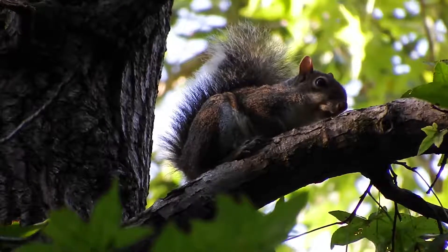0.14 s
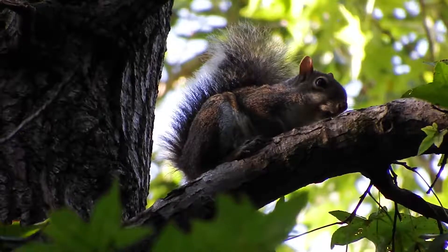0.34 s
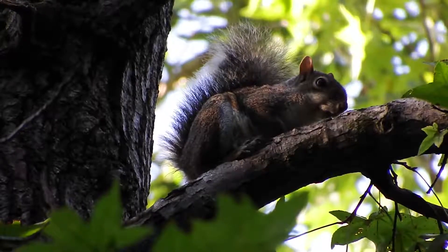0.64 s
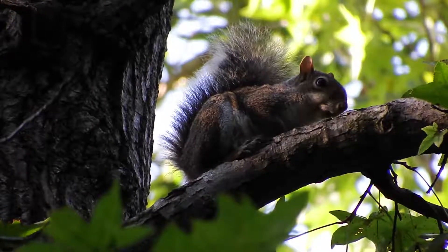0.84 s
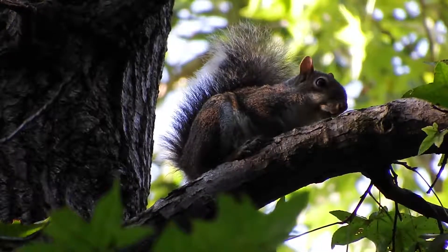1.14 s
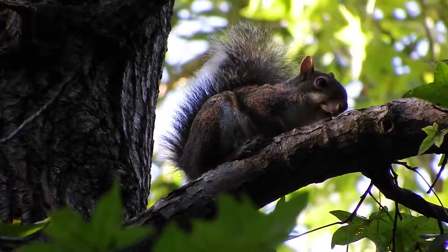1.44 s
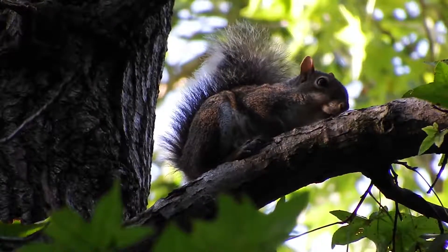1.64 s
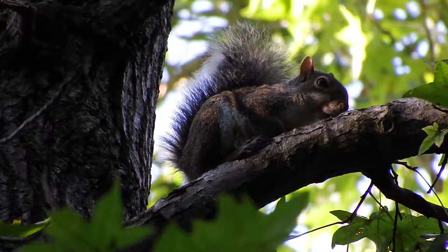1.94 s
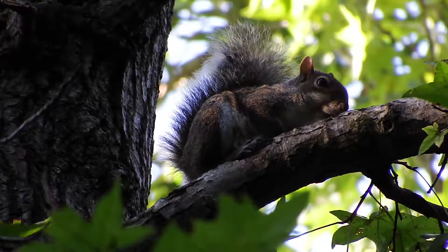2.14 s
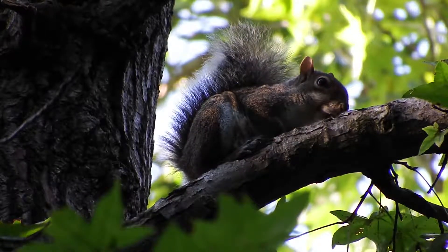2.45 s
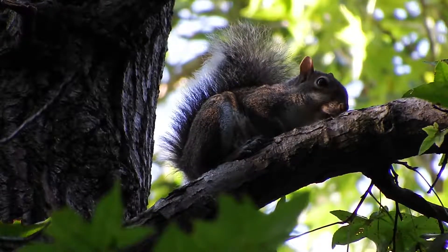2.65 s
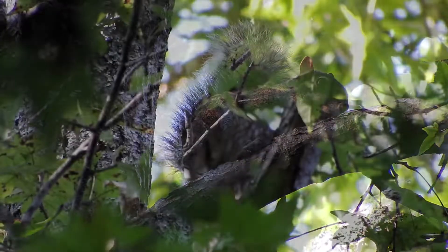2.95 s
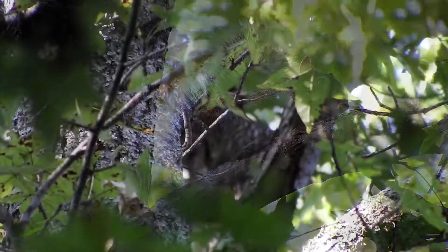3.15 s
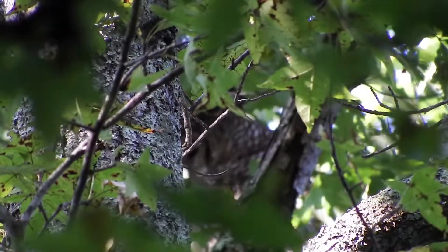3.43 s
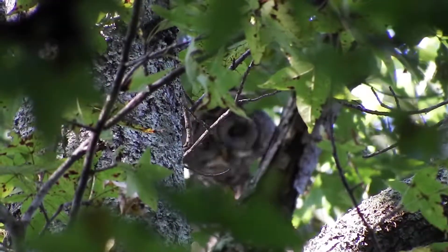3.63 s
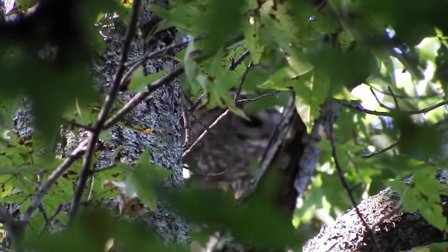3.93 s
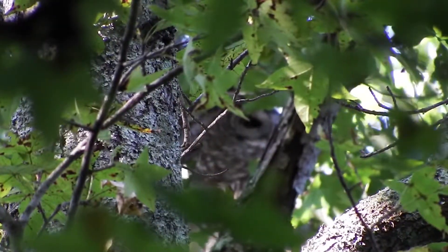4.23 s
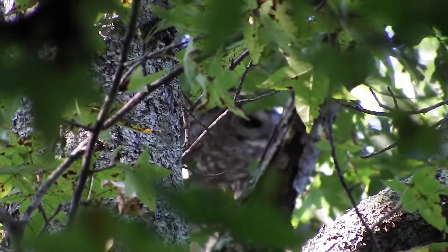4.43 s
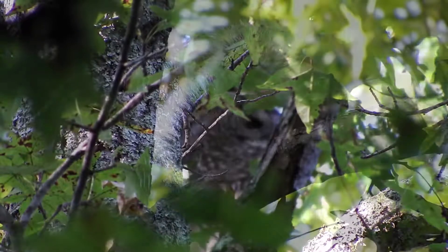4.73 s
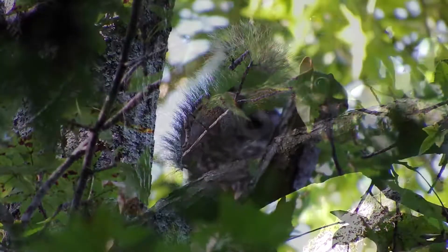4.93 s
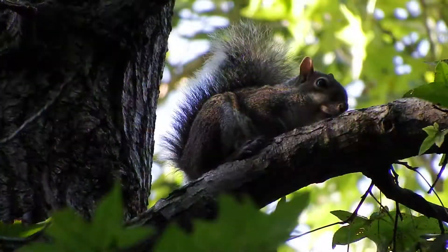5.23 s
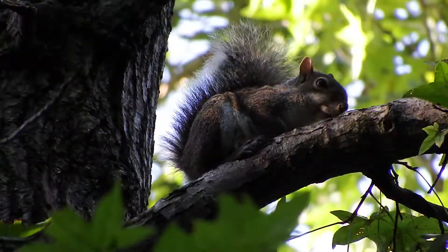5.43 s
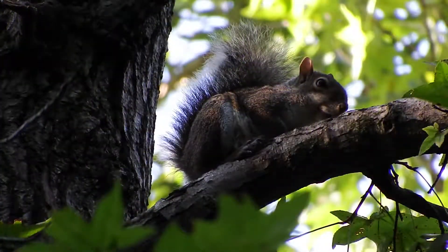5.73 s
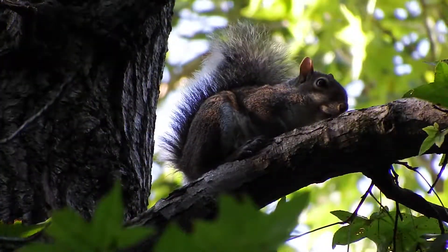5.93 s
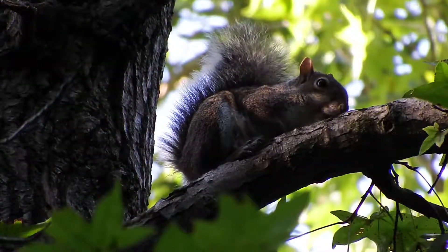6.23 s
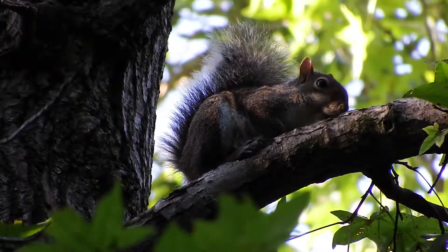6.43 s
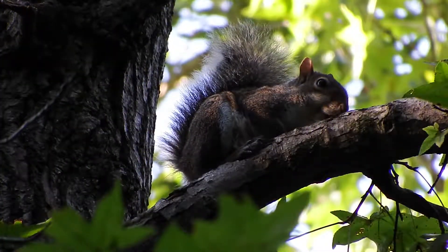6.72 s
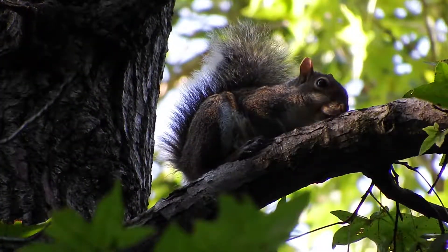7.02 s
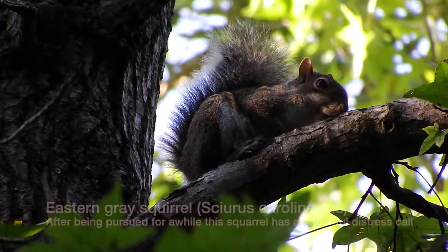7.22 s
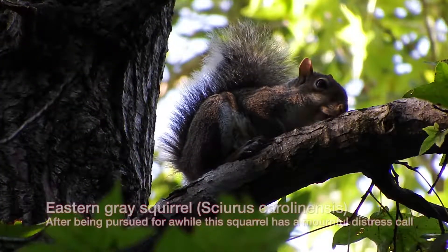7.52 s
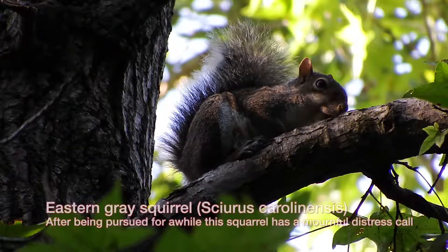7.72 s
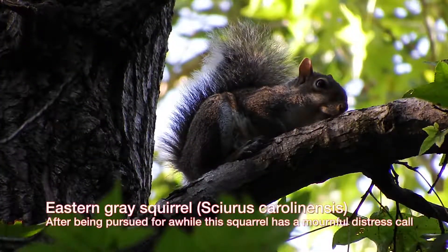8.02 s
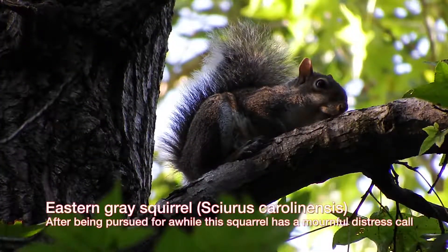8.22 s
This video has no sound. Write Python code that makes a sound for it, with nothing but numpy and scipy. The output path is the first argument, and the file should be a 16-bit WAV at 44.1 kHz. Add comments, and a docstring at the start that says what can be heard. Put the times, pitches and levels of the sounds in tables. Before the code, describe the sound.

A small camera motor ticks and clacks off, then a squirrel moans hoarsely in woodland, a wren sings loudly, and the squirrel moans again over hiss.

```python
"""A camera's lens motor ticks first, over distant wash and single far whistles; then a squirrel moans twice
in a wood, another answers once, a wren sings four phrases and a far bird whistles on.
Birds are gliding sines; moans are rough harmonics and air puffs through three moving mouth resonances.
Random echoes make the wood, shaped noise the wash, and ringing steps the motor. The microphone is dull
above 5 kHz, with narrow dips, and its amplifier hisses."""
import sys
import numpy as np
from scipy import signal
from scipy.io import wavfile
from scipy.ndimage import uniform_filter1d

SR = 44100
rng = np.random.default_rng(int(sys.argv[2]) if len(sys.argv) > 2 else 0)


def store_pcm(level_fs):
    """Save levels as 16-bit WAV."""
    pcm = np.round(np.clip(level_fs, -1, 1) * 32767).astype(np.int16)
    wavfile.write(sys.argv[1], SR, np.atleast_2d(pcm).T)


N = 369024

# Levels in the tables are relative: the mix, the wood and the microphone act on them afterwards.
# Spectrum of the distant wash: freq_hz, level_db per Hz
WASH_SPECTRUM = [(25, -52), (45, -52), (85, -20), (160, -13), (200, -12.5), (270, -4), (450, -2),
                 (750, 1.57), (1300, -4.5), (2300, -12.5), (2900, -12), (3900, -11), (6000, -22.5)]
# Spectrum of the amplifier hiss: freq_hz, level_db per Hz
HISS_SPECTRUM = [(30, -29), (300, -34), (6000, -2.5), (9000, -1.5), (15800, -7.5)]
# Stereo likeness of the wash: freq_hz, likeness (0-1)
WASH_LIKENESS = [(60, 1), (130, 0.96), (280, 0.89), (700, 0.92), (1300, 0.97), (2400, 0.92), (4400, 0.99)]
# Decay of the wood by band: freq_hz, t60_s (at damping 1)
WOOD_DECAY = [(1500, 0.99), (3000, 1), (5000, 0.69)]
# Colour of the microphone: freq_hz, level_db
MIC_COLOUR = [(20, -2), (4100, -1.26), (4450, 0), (4750, -6.5), (5200, -11), (5800, -17.5), (7000, -19.5),
              (9000, -36), (11000, -47)]
# Narrow dips of the microphone: freq_hz, width_hz, depth_db
MIC_DIPS = [(217.6, 17.5, 23), (1094, 109, 15), (2440, 36, 6)]
# Strength of the motor over time: time_s, level_db, loss_db of every other step
MOTOR_LEVELS = [(0.0, -47, 2), (.3, -50.5, 3), (.65, -47, 4), (1.0, -48.5, 26), (1.3, -48, 18),
                (1.46, -48.5, 3)]
# Resonances of the camera housing: freq_hz, width_hz, level_db
HOUSING_MODES = [(349, 117, -3.5), (813, 280, 4), (1454, 345, -1), (1880, 1080, -6.5), (3390, 880, -7.5),
                 (4256, 200, -5.5)]
# Far bird's song, one row a repeat: held_note_start_s, level_db, held_note_hz, low_notes_db
FAR_SONGS = [(1.305, -44.5, 3815, -51), (1.695, -41, 3784, -55), (2.14, -44, 3673, -56),
             (2.54, -46.5, 3610, -69), (7.32, -40.5, 3780, -54.5), (7.712, -42.5, 3715, -51),
             (8.1, -42, 3647, -71)]
# Its high notes: lag_s from the held note, length_s, start and end pitch (shares of it), level_db, buzz (0-1)
FAR_HIGH_NOTES = [(-.095, 0.082, .815, .815, -5, 0.8), (-.022, 0.0236, .845, 0.94, 0, 0.44),
                  (0, .125, 1.002, .998, 0, 0.14)]
# Its low notes: lag_s from the held note, length_s, start_hz, end_hz, level_db, buzz (0-1)
FAR_LOW_NOTES = [(0.112, 0.0502, 2018, 2437, 3.5, 0.3), (0.196, 0.086, 2450, 2455, 5.5, 0.17)]
# Far two-note calls: start_s, level_db
FAR_CALLS = [(.388, -47), (.758, -49), (1.127, -47.5)]
# Notes of such a call: lag_s, length_s, start_hz, end_hz, level_db, buzz (0-1)
FAR_CALL_NOTES = [(0, 0.0183, 3450, 2895, 3, 0.66), (0.047, 0.024, 3740, 3800, 0, 0.16)]
# Single far notes: start_s, length_s, start_hz, end_hz, level_db, buzz (0-1)
FAR_LONE_NOTES = [(0.0, 0.083, 3124, 3040, -52.5, 1), (0.014, 0.067, 4170, 4320, -51, 1),
                  (2.794, 0.16, 3333, 3230, -46, 0.2), (2.951, 0.11, 3200, 3000, -50, 0.34)]
# Sharp falling click that opens the wren's song: level_db, start_hz, end_hz, glide_s, t60_s
WREN_CLICK = (-13, 4000, 3150, .0012, .012)
# Wren's opening chips: start_s, level_db, start_hz, end_hz, length_s
WREN_CHIPS = [(4.877, -22.5, 3780, 3520, 0.0064), (5.271, -18, 3960, 3430, 0.0069),
              (5.665, -18.5, 3980, 3690, 0.011)]
# Side notes of a chip: lag_s (from its start / its end), length_s, start_hz, end_hz, level_db
WREN_CHIP_LEAD = (-.008, .005, 4850, 4650, -18)
WREN_CHIP_TAIL = (-.0015, .006, 3150, 2700, -12)
# Wren's phrases: start_s, level_db, pitch factor, closing_fall_db, hook_db
WREN_PHRASES = [(4.5445, -32.5, 0.99, -36.5, -50), (4.9545, -27.5, .985, -36.5, -31),
                (5.3525, -23.5, .975, -33.5, -27.5), (5.7484, -22.5, 1.002, -32.5, -45)]
# Notes of a phrase before its pitch factor: lag_s, length_s, start_hz, end_hz, level_db
WREN_PHRASE_NOTES = [(-.04, 0.035, 2374, 2200, -14), (-.005, 0.018, 2664, 3177, 0),
                     (0.011, 0.0084, 3520, 3990, -4), (0.014, 0.0206, 3970, 4360, -6.5),
                     (0.035, .014, 4450, 4900, -6), (.086, 0.028, 2285, 2760, -7.5),
                     (.104, 0.0202, 2688, 2912, -1)]
# Dip into the first strong note: lag_s, length_s, start_hz, end_hz
WREN_HOOK = (-.014, .013, 3050, 2700)
# Closing fall before the pitch factor: lag_s, length_s, start_hz, end_hz
WREN_FALL = (.14, .075, 2290, 1800)
# Thin whistles in the voice late in a moan: start_s, length_s, start_hz, end_hz, level_db, buzz (0-1)
SQUIRREL_SQUEAKS = [(2.626, 0.159, 2843, 2726, -42, 0.24), (7.038, .3, 2740, 2640, -44, 0.49)]
# Moans: start_s, length_s, slowing of the drawn-out part, full_voice_s from the start, first-cry brightness_db
SQUIRREL_MOANS = [(1.792, 1.11, 1.001, 0.111, 29), (6.184, 1.2, 1.24, 0.055, 40)]
# Voice, one table a moan, before slowing: time_s, pitch_hz, roughness (0-1), strong-weak share (0-1)
SQUIRREL_VOICES = [
    [(0, 585, .07, .03), (.035, 540, .1, .05), (.055, 525, .2, .9), (.12, 540, .25, .9), (.2, 520, .35, .7),
     (.24, 488, .18, .1), (.31, 448, .11, .05), (.37, 422, .12, .1), (.46, 405, .3, .3),
     (.63, 392, .45, .5), (.8, 412, .45, .4), (.95, 404, .35, .2), (.97, 556, .45, .6), (1.11, 545, .7, .5)],
    [(0, 530, .07, .03), (.05, 525, .1, .08), (.066, 515, .25, .9), (.14, 535, .33, .9), (.2, 518, .38, .8),
     (.255, 470, .16, .1), (.35, 432, .14, .1), (.4, 414, .35, .8), (.45, 410, .35, .8),
     (.52, 390, .33, .3), (.67, 388, .45, .4), (.75, 404, .5, .5), (.95, 410, .4, .3), (.97, 556, .5, .6),
     (1.11, 545, .7, .5)],
]
# Mouth, one table a moan, before slowing: time_s, low_db, mid_db, high_db, low_hz, mid_hz, high_hz
SQUIRREL_MOUTHS = [
    [(0, -65, -55, -58, 2180, 3020, 3850), (.02, -32, -59, -52, 2190, 2900, 4160),
     (.046, -28.5, -48, -29.5, 2000, 2800, 4100), (.1, -28, -55, -34.5, 2070, 2870, 3970),
     (.19, -34, -40.5, -34, 1990, 3300, 3790), (.24, -47, -33.5, -34, 2340, 3380, 3900),
     (.31, -45, -36, -48, 2180, 3150, 3770), (.4, -38.5, -40.5, -45, 2040, 3260, 3700),
     (.63, -39.5, -44, -47.5, 1980, 3120, 3950), (.78, -41.5, -46, -36, 2090, 3140, 3630),
     (.86, -47, -51, -45, 2050, 2970, 4100), (.955, -58, -60, -39, 2050, 2800, 3980),
     (.975, -36.5, -54, -36.5, 2260, 2700, 3950), (1.04, -41.5, -53, -36, 2240, 2700, 3970),
     (1.11, -63, -54, -61, 2180, 2750, 3800)],
    [(0, -77, -53, -70, 2120, 3000, 3950), (.02, -29, -59, -55, 2100, 2920, 4260),
     (.046, -39, -37, -35, 2130, 2960, 4150), (.09, -29.5, -57, -36.5, 1940, 2900, 3970),
     (.17, -36, -44, -36, 2100, 3330, 3840), (.24, -42, -35, -36.5, 2260, 3350, 3850),
     (.31, -45, -38, -54, 2230, 3120, 3750), (.4, -37.5, -43, -52.5, 2000, 3230, 3800),
     (.63, -40.5, -43, -44.5, 1940, 3050, 3900), (.72, -41, -46, -41, 2020, 3270, 3850),
     (.8, -45, -54, -45.5, 2130, 3200, 4080), (.9, -50, -45, -40, 2080, 3220, 4180),
     (.955, -61, -55, -38, 2050, 3150, 4000), (.975, -34, -59, -37, 2320, 3100, 3950),
     (1.0, -41, -56, -43, 2190, 2970, 4000), (1.04, -65, -52, -56, 2150, 2820, 3820)],
]
# The other squirrel's moan, voice and mouth: columns as for the first squirrel
OTHER_MOAN = (4.81, .51, 1, 0, -20)
OTHER_VOICE = [(0, 1010, .07, .02), (.03, 995, .07, .02), (.062, 1008, .07, .02), (.07, 1015, .12, .6),
               (.14, 1012, .12, .6), (.17, 1000, .15, .15), (.26, 942, .25, .3), (.34, 950, .3, .3),
               (.39, 1020, .2, .1), (.51, 1010, .3, .1)]
OTHER_MOUTH = [(0, -49, -60, -62, 1940, 2720, 4050), (.02, -42.5, -44, -56, 1900, 2660, 3960),
               (.06, -38, -47, -42.5, 1820, 2900, 3900), (.15, -38, -59, -39, 1780, 2900, 3740),
               (.19, -53, -49, -45, 1900, 2660, 3770), (.27, -54, -39, -39, 1730, 2460, 3340),
               (.35, -63, -41, -56, 1780, 2490, 3750), (.45, -47, -46, -42, 1820, 2660, 4030),
               (.51, -59, -63, -44, 1900, 2650, 4000)]

WASH_DB, HISS_DB = -46, -63.5
EDGE_HZ = 15800  # upper band limit
CLICK_S, STOP_S = 4.4782, 1.517  # the wren's click and the motor's closing clack
STOP_DB = -23
NEAR_APART, FAR_APART = .04, .15  # left-right spread of the echoes
NEAR_DAMPING, FAR_DAMPING = 1.5, .84  # the squirrels' echoes die sooner
SHARP_WET_DB = -5  # clicks and chips are aimed at the camera and stir the wood less
FALL_FADE_DB = -10.5  # the wren's fall dies away as it descends
FLUTTER_DB = 12  # level flutter per unit of buzz, which counts up to 0.2 here
BREAK_S = .35  # the slide down ends and the drawn-out part begins
STRAND_DB = 4.5  # each harmonic wavers by itself, times the root of roughness
WAVER_DB = 3  # each mouth resonance wavers, times roughness
HELD_DB = -6.5  # the voice holds back after the first cry
BRIGHT_S = .064  # the top resonance is strong in the first cry, then fades


def gain_of(db):
    """Decibels to amplitude."""
    return 10 ** (np.asarray(db) / 20)


def evened(x):
    """Brings a sound to rms 1."""
    return x / np.sqrt(np.mean(x ** 2) + 1e-20)


def read(points, hz):
    """Reads a curve along a logarithmic frequency axis."""
    f, value = np.transpose(points)
    return np.interp(np.log(hz + 1), np.log(f + 1), value)


def add(mix, s, sound):
    """Lays a sound into the mix at s seconds."""
    part = mix[round(s * SR):][:len(sound)]
    part += sound[:len(part)]


def drift(count, size):
    """Smooth chance of rms 1."""
    return evened(uniform_filter1d(uniform_filter1d(rng.standard_normal(count), size), size))


def above(x, hz):
    """Third-order high-pass."""
    return signal.sosfilt(signal.butter(3, hz, "high", fs=SR, output="sos"), x)


def resonate(x, hz, width_hz):
    """Moving resonance: shifts the curve hz down to zero, smooths twice, and shifts back."""
    turn = np.exp(2j * np.pi * np.cumsum(hz * np.ones(len(x))) / SR)
    r = np.exp(-np.pi * width_hz / SR)
    smooth = signal.lfilter([(1 - r) ** 2], [1, -2 * r, r * r], x / turn)
    return 2 * (turn * smooth).real


def note(length, start_hz, end_hz, db, buzz=0, edge=0.057):
    """A gliding sine; buzz shakes its pitch and level, edge is the faded share of its length."""
    count = max(round(length * SR), 40)
    hz = np.linspace(start_hz, end_hz, count) * (1 + 0.1 * buzz * drift(count, size=30))
    level = gain_of(db + FLUTTER_DB * min(buzz, .2) * drift(count, size=400))
    fade = signal.windows.tukey(count, np.clip(edge, 0, 1))
    return level * np.sin(2 * np.pi * np.cumsum(hz) / SR) * fade


def noise(points, same, patchy_db):
    """Two channels of random short-time spectra with drifting patches, for wash and hiss."""
    frames, hz = N // 512 + 8, np.fft.rfftfreq(2048, 1 / SR)
    a, b, c, d, patches = rng.standard_normal((frames, 1025, 5)).T
    patches = evened(uniform_filter1d(uniform_filter1d(patches, 20, 0), 8, 1))
    like = np.clip(read(same, hz), -1, 1)[:, None]
    left = a + 1j * b
    right = like * left + np.sqrt(1 - like ** 2) * (c + 1j * d)
    z = np.array([left, right]) * gain_of(read(points, hz)[:, None] + patchy_db * patches)
    return evened(signal.istft(z, nperseg=2048, noverlap=1536)[1][:, 2048:N + 2048])


def wood(x, apart, damping):
    """Sparse echoes off trunks and leaves, dying by band, a little weakened at first; both ports nearly alike."""
    taps = np.zeros((2, SR))
    at = np.arange(300, SR - 20, 20) + rng.integers(0, 20, (2, (SR - 301) // 20))
    np.put_along_axis(taps, at, rng.choice([-1., 1.], at.shape), 1)
    hz, t, z = signal.stft(taps, SR, nperseg=256)
    decay = gain_of(-60 * damping * t / read(WOOD_DECAY, hz)[:, None])
    early_loss = 1 - 0.4 * np.exp(-t / 0.4)
    a, b = signal.istft(z * decay * early_loss, SR, nperseg=256)[1]
    tail = np.array([a + apart * b, a - apart * b]) / np.linalg.norm(a)
    return signal.fftconvolve(x[None], tail, axes=1)[:, :N]


def microphone(x):
    """Causal colour of the capsule behind its port: narrow dips and a steep loss of treble."""
    hz = abs(np.fft.fftfreq(16384, 1 / SR))
    dips_db = sum(depth_db / (1 + (2 * (hz - f) / w) ** 2) for f, w, depth_db in MIC_DIPS)
    log_gain = np.log(gain_of(read(MIC_COLOUR, hz) - dips_db))
    # the phase that belongs to this gain in a minimum-phase filter
    phase = -signal.hilbert(log_gain).imag
    taps = np.fft.ifft(np.exp(log_gain + 1j * phase)).real[:8192]
    return signal.oaconvolve(x, taps[None], axes=1)[:, :N]


def lens_motor():
    """Some sixty steps a second, every other one weaker, over a whirr ring the housing; a clack ends them."""
    s, db, loss_db = np.transpose(MOTOR_LEVELS)
    count = round(1.7 * SR)
    t, n = np.arange(count) / SR, np.arange(500)
    blows = gain_of(-11.5) * rng.standard_normal(count)  # the whirr
    for k, (late, size) in enumerate(rng.standard_normal((88, 2))):
        step = rng.standard_normal(500) * np.exp(-n / 164.0) * np.minimum(n / 60.0, 1)
        at = .0025 + k / 59.94 + .001 * late
        step_db = 3.0 + 0.37 * size - np.interp(at, s, loss_db) * (k % 2)
        add(blows, at, gain_of(step_db) * step)
    blows *= gain_of(np.interp(t, s, db) + 23.5) * (t < s[-1])
    ring = sum(gain_of(db) * resonate(blows, hz, w) for hz, w, db in HOUSING_MODES)
    clack = np.zeros(count)
    add(clack, STOP_S, gain_of(STOP_DB) * rng.standard_normal(360) * np.hanning(360))
    clack_db = (-18, 4.5, 2.5, 2.0, -1, 7.0)  # it stirs the housing in other proportions
    ring += sum(gain_of(db) * resonate(clack, hz, w) for (hz, w, _), db in zip(HOUSING_MODES, clack_db))
    band = signal.butter(4, [200, 4700], "band", fs=SR, output="sos")
    return np.pad(signal.sosfilt(band, ring), (0, N - count))


def far_bird():
    """A buzz and a rising slur lead to a held whistle, two low notes follow; also calls and single notes."""
    out = np.zeros(N)
    for s, db, hz, low_db in FAR_SONGS:
        for lag, length, start, end, note_db, buzz in FAR_HIGH_NOTES:
            add(out, s + lag, note(length, start * hz, end * hz, db + note_db, buzz, edge=0.16))
        for lag, length, start_hz, end_hz, note_db, buzz in FAR_LOW_NOTES:
            add(out, s + lag, note(length, start_hz, end_hz, low_db + note_db, buzz, edge=0.46))
    for s, db in FAR_CALLS:
        for lag, length, start_hz, end_hz, note_db, buzz in FAR_CALL_NOTES:
            add(out, s + lag, note(length, start_hz, end_hz, db + note_db, buzz, edge=0.44))
    for s, *row in FAR_LONE_NOTES:
        add(out, s, note(*row, edge=0.31))
    return out


def wren_chip(sharp, s, db, start_hz, end_hz, length):
    """A short soft-edged glide with a faint note at its start and at its end."""
    add(sharp, s, note(length, start_hz, end_hz, db + 1.5, edge=.85))
    for at, (lag, long, a_hz, b_hz, side_db) in ((s, WREN_CHIP_LEAD), (s + length, WREN_CHIP_TAIL)):
        add(sharp, at + lag, note(long, a_hz, b_hz, db + side_db))


def wren_phrase(out, s, db, pitch, fall_db, hook_db):
    """Quick gliding notes after a hook, closed by a fading fall."""
    add(out, s + WREN_HOOK[0], note(*WREN_HOOK[1:], hook_db, edge=.6))
    lag, length, start_hz, end_hz = WREN_FALL
    fall = note(length, pitch * start_hz, pitch * end_hz, fall_db, buzz=.1, edge=.3)
    add(out, s + lag, fall * gain_of(np.linspace(0, FALL_FADE_DB, len(fall))))
    for lag, length, start_hz, end_hz, note_db in WREN_PHRASE_NOTES:
        tone = note(length, pitch * start_hz, pitch * end_hz, db + note_db, buzz=.05, edge=.9)
        add(out, s + lag, tone)


def wren_click(sharp):
    """A sine whose pitch and level drop fast, under a shorter burst of bright noise."""
    t = np.arange(400) / SR
    db, start_hz, end_hz, glide_s, t60 = WREN_CLICK
    turns = np.cumsum(end_hz + (start_hz - end_hz) * np.exp(-t / glide_s)) / SR
    tone = gain_of(db - 60 * t / t60) * np.sin(2 * np.pi * turns)
    add(sharp, CLICK_S, tone * np.minimum(t / 0.0004, 1))
    add(sharp, CLICK_S, above(gain_of(db + 0.5 - 60 * t / 0.0059) * rng.standard_normal(400), 4500))


def wren():
    """A click or a chip before each of four phrases, a late trunk echo; gives direct sound and wood feed."""
    out, sharp = np.zeros((2, N))
    for row in WREN_CHIPS:
        wren_chip(sharp, *row)
    for row in WREN_PHRASES:
        wren_phrase(out, *row)
    out = out + gain_of(-11.5) * np.roll(out + gain_of(SHARP_WET_DB) * sharp, round(.079 * SR))
    wren_click(sharp)
    return out + sharp, out + gain_of(SHARP_WET_DB) * sharp


def voice_drive(hz, rough, uneven):
    """Wavering harmonics, half-way lines from strong and weak pulses, and puffs of air."""
    count = len(hz)
    shake = .035 * drift(count, size=120) + .025 * drift(count, size=700)
    turns = np.cumsum(hz * (1 + rough * shake)) / SR
    folds = np.zeros(count)
    for k in range(3, 38):  # in half pitches: odd ones are the half-way lines
        strand = gain_of(STRAND_DB * np.sqrt(rough) * drift(count, size=500))
        wave = np.cos(np.pi * k * turns + 2 * np.pi * rng.random())
        folds += (uneven if k % 2 else 1) * strand * wave
    puffs = (1.0 + np.exp(-(turns % 1) / 1.7)) * rng.standard_normal(count)
    drive = np.sqrt(1 - rough) * evened(folds) + np.sqrt(rough) * 1.2 * evened(puffs)
    return drive * gain_of(2.5 * rough * drift(count, size=200))  # the voice stutters as it roughens


def moan(mouth, voice, start, length, slowing, full_s, bright_db):
    """The voice passes three moving mouth resonances, a fading bright top and a shrill edge at the start."""
    t = np.arange(0, length, 1 / SR)
    stage = np.minimum(t, BREAK_S) + np.maximum(t - BREAK_S, 0) / slowing
    s, *columns = np.transpose(mouth)
    low_db, mid_db, high_db, low_hz, mid_hz, high_hz = (np.interp(stage, s, c) for c in columns)
    s, *columns = np.transpose(voice)
    hz, rough, uneven = (np.interp(stage, s, c) for c in columns)
    drive = voice_drive(hz, rough, uneven)
    held_db = HELD_DB * np.clip((t - .03) / 0.0059, 0, 1) * np.clip((full_s - t) / 0.0059, 0, 1)
    low_db, mid_db, high_db = (held_db + c + WAVER_DB * rough * drift(len(t), size=900)
                               for c in (low_db, mid_db, high_db))
    out = gain_of(low_db) * evened(resonate(drive, low_hz, 500))
    out -= gain_of(mid_db) * evened(resonate(drive, mid_hz, 770))
    out += gain_of(high_db) * evened(resonate(drive, high_hz, 690))
    top_db = high_db - 19.0 + bright_db * np.exp(-t / BRIGHT_S)
    out += gain_of(top_db) * evened(resonate(drive, 4500, 540))
    out += gain_of(high_db + 8.5 - 88 * t) * evened(resonate(drive, 9250, 1140))  # shrill edge
    floor_hz = 0.83 * low_hz.min()
    out = above(above(out, floor_hz), floor_hz)
    return start, gain_of(-1.0) * out * signal.windows.tukey(len(t), .03)


def squirrels():
    """Two moans with thin whistles and their lower octaves, and the other squirrel's answer."""
    squirrel, other = np.zeros((2, N))
    for mouth, voice, row in zip(SQUIRREL_MOUTHS, SQUIRREL_VOICES, SQUIRREL_MOANS):
        add(squirrel, *moan(mouth, voice, *row))
    add(other, *moan(OTHER_MOUTH, OTHER_VOICE, *OTHER_MOAN))
    for s, length, start_hz, end_hz, db, buzz in SQUIRREL_SQUEAKS:
        add(squirrel, s, note(length, start_hz, end_hz, db, buzz))
        add(squirrel, s, note(length, start_hz / 2, end_hz / 2, db - 12.0, buzz))
    return squirrel, other


def tilted(x, db):
    """Raises the left channel and lowers the right by db."""
    return x * gain_of([[db], [-db]])


def scene():
    """Direct sounds, their echoes and the wash reach the microphone; the motor comes through the housing."""
    squirrel, other = squirrels()
    (near, spread), far = wren(), far_bird()
    direct = tilted(squirrel, .15) + tilted(near, .95) + tilted(far + other, .2)
    echoes = wood(gain_of(-4) * squirrel + gain_of(-5.5) * other, NEAR_APART, NEAR_DAMPING)
    echoes += wood(gain_of(-1.5) * spread + gain_of(2.0) * far, FAR_APART, FAR_DAMPING)
    wash = gain_of(WASH_DB) * noise(WASH_SPECTRUM, WASH_LIKENESS, patchy_db=0.98)
    air = direct + echoes + tilted(wash, .2)
    return microphone(air) + tilted(lens_motor(), .4)


def record(dry):
    """Adds amplifier hiss, mostly different in each channel, then the band limit."""
    likeness = [(100, 0.13), (8000, 0.11), (16000, 0.23)]  # freq_hz, likeness (0-1)
    wet = dry + gain_of(HISS_DB) * noise(HISS_SPECTRUM, likeness, patchy_db=2.0)
    taps = signal.firwin(1023, EDGE_HZ, window=("kaiser", 10), fs=SR)
    return signal.oaconvolve(wet, taps[None], "same", axes=1)


dry = scene()
out = record(dry)
store_pcm(out)
```